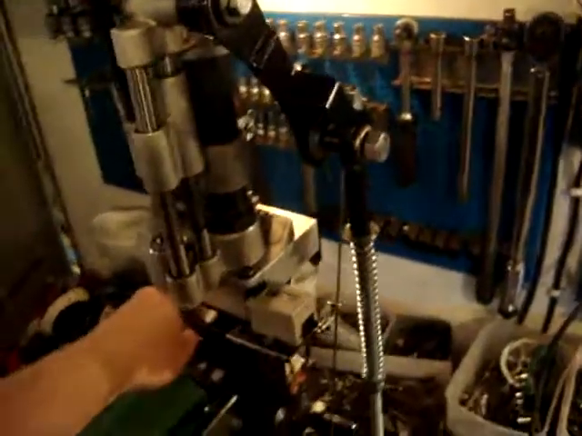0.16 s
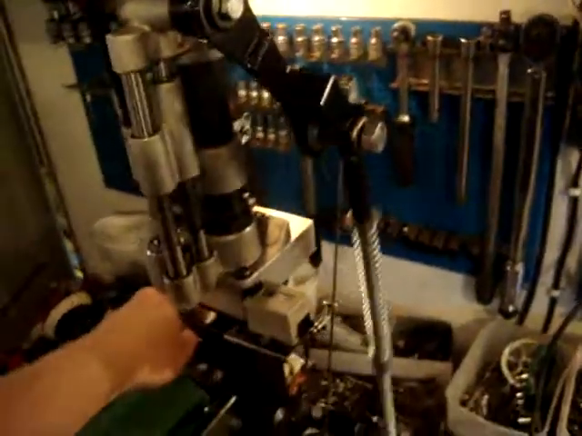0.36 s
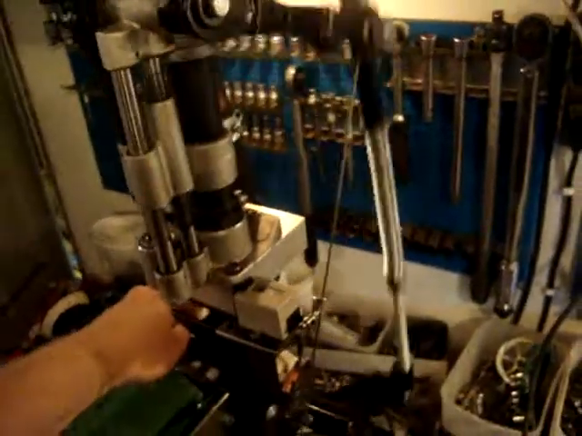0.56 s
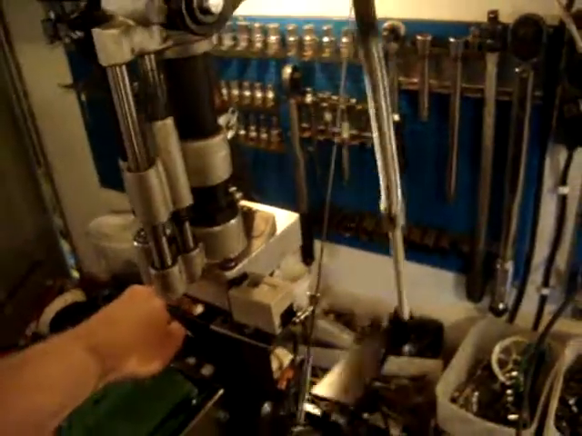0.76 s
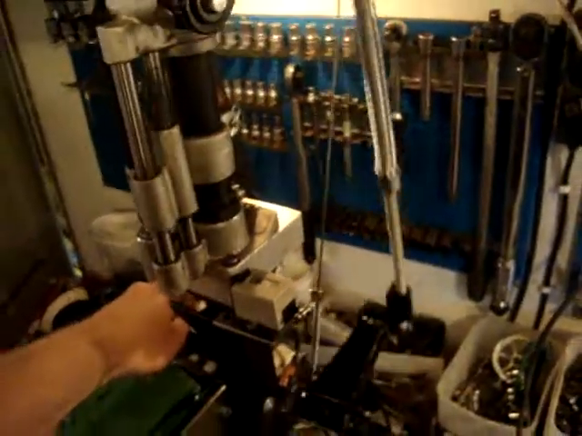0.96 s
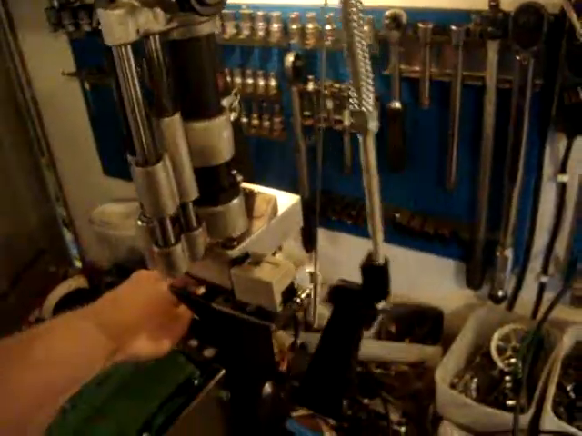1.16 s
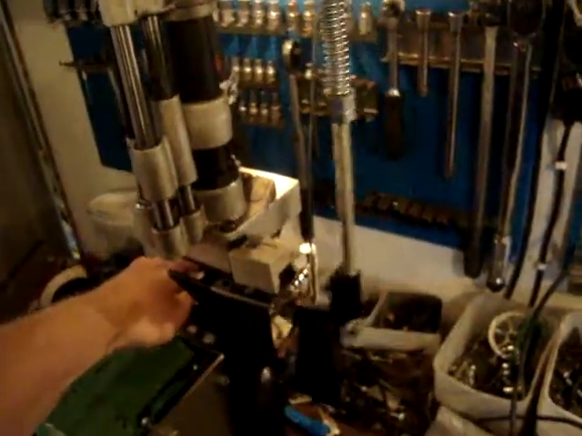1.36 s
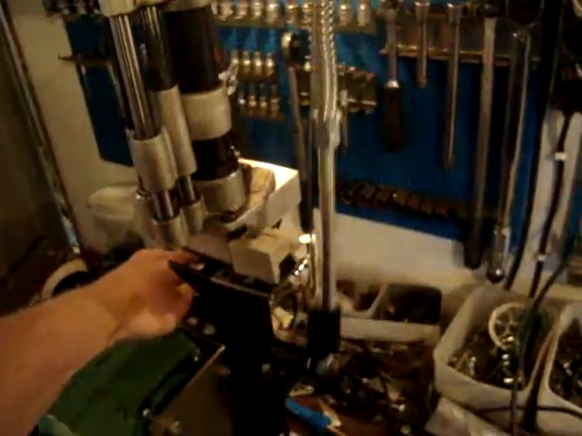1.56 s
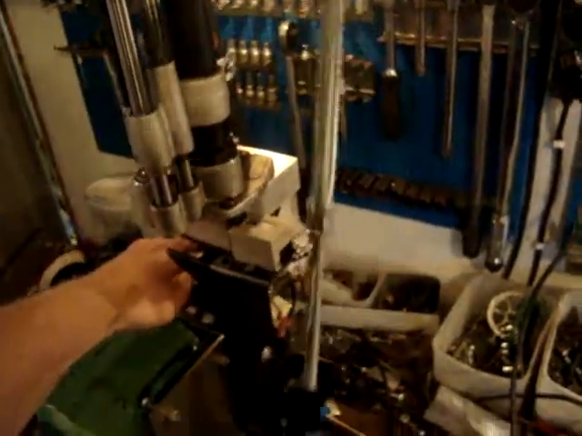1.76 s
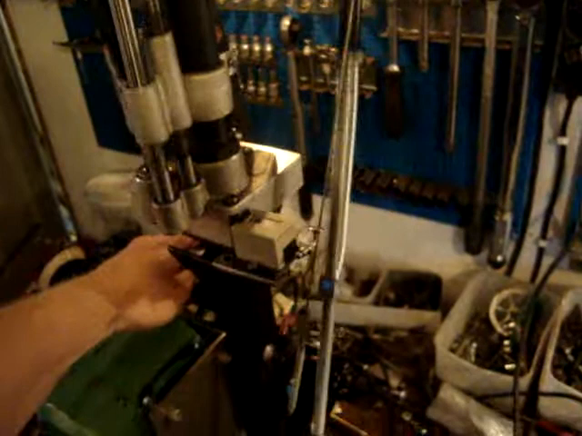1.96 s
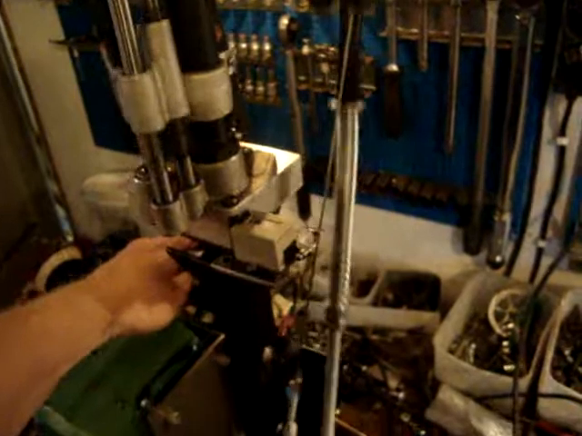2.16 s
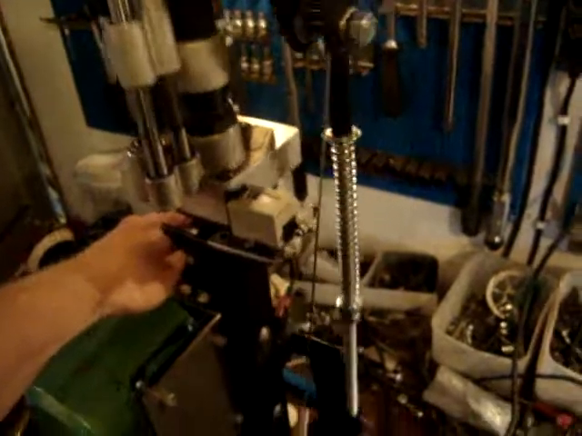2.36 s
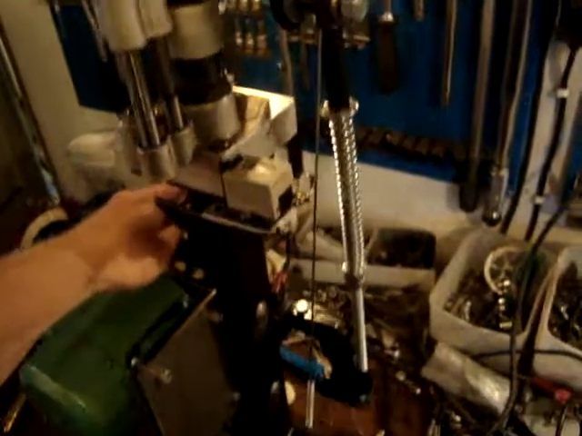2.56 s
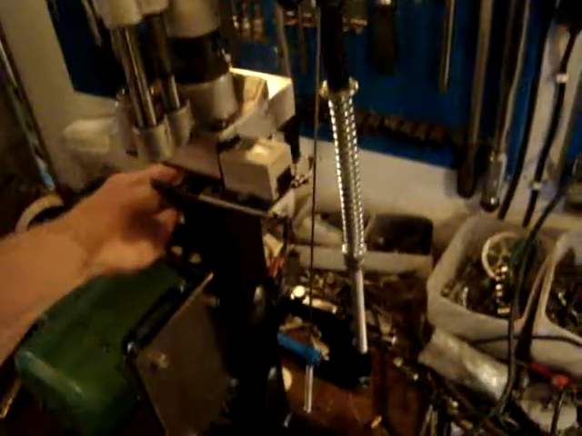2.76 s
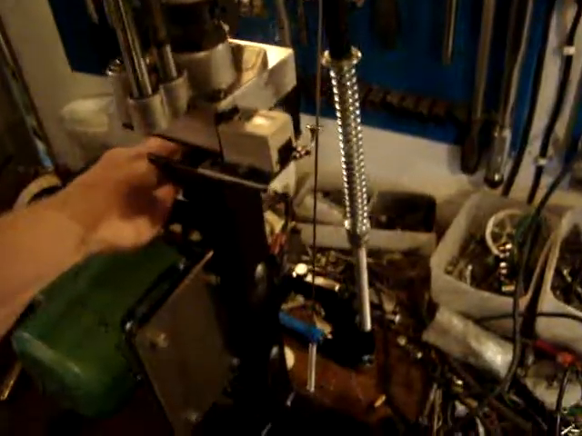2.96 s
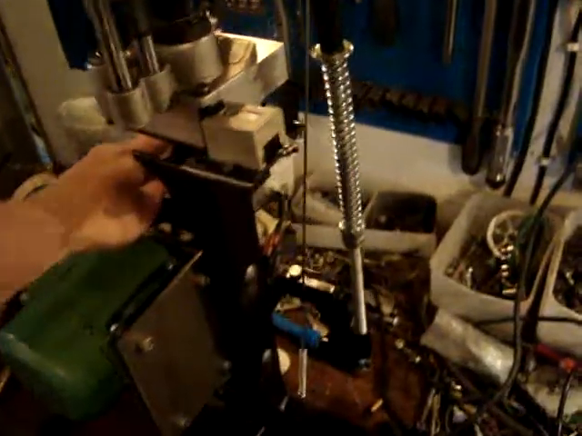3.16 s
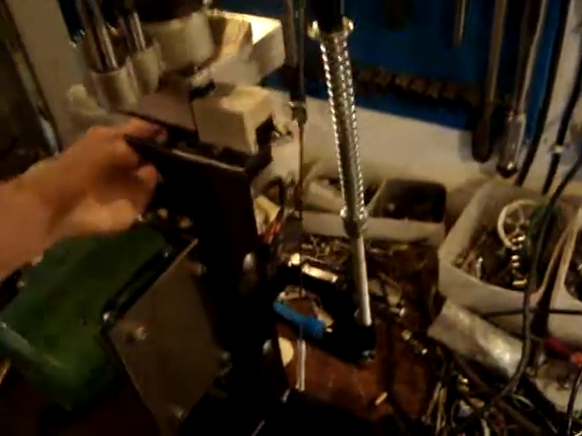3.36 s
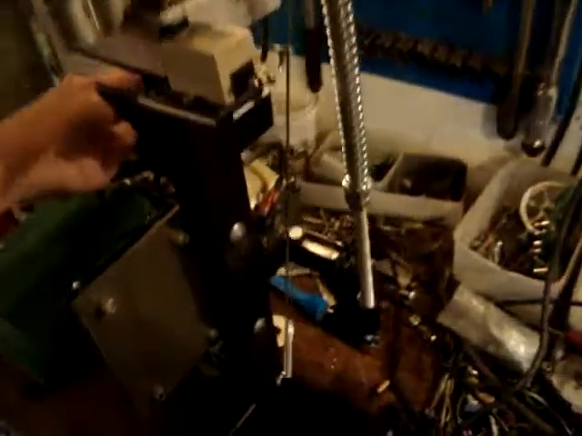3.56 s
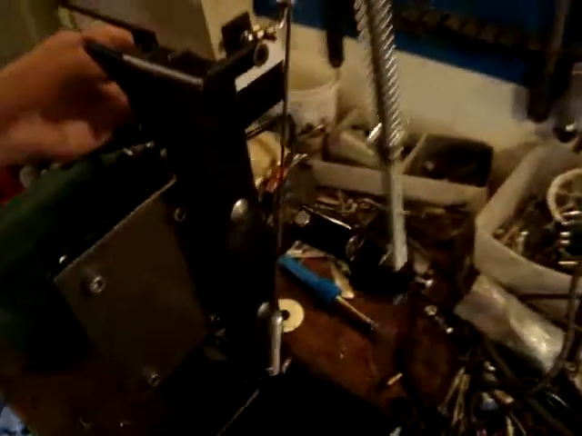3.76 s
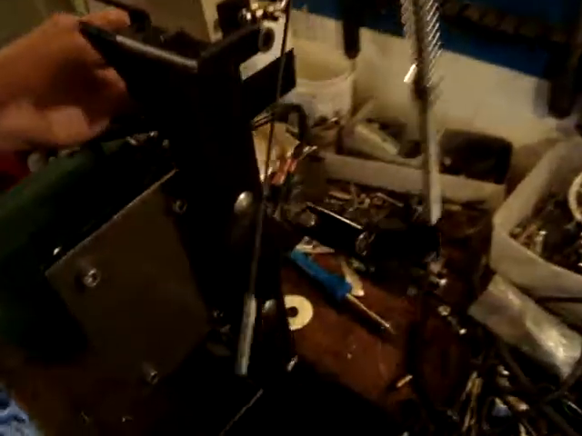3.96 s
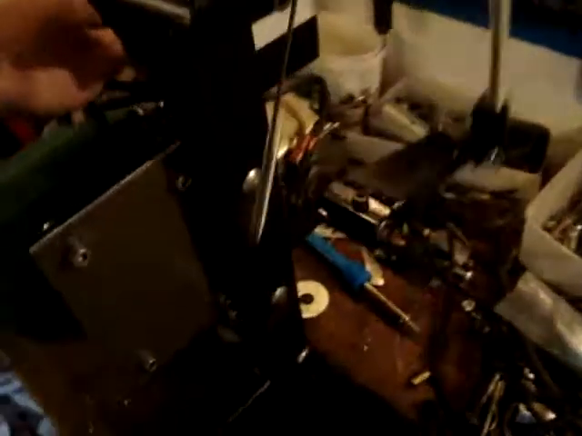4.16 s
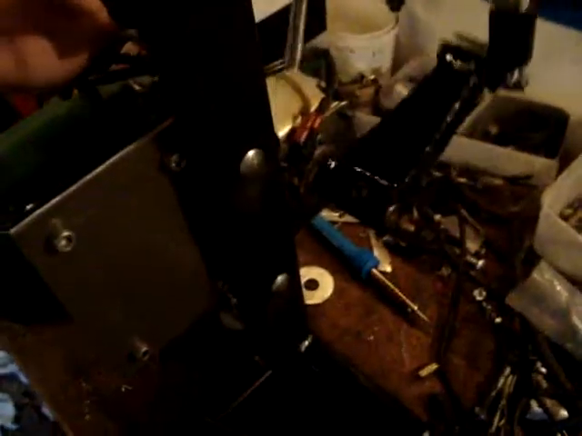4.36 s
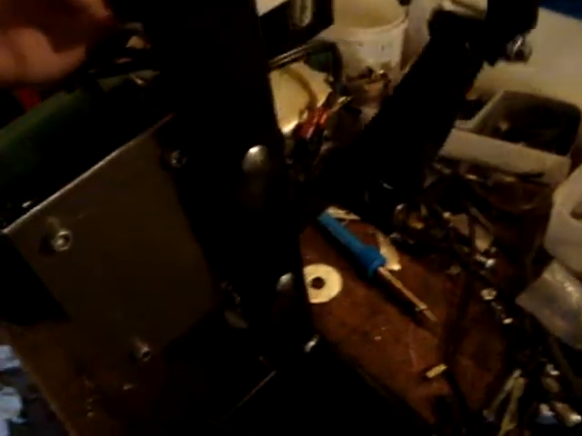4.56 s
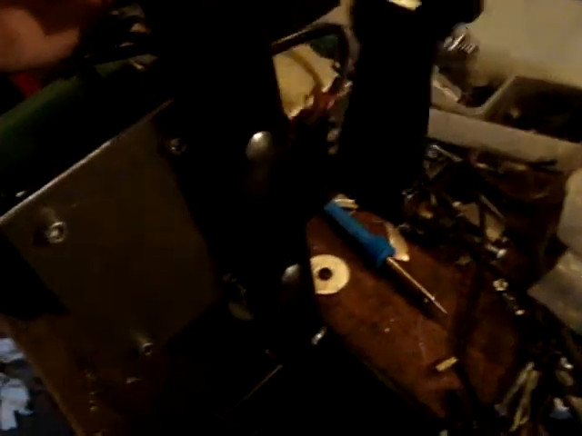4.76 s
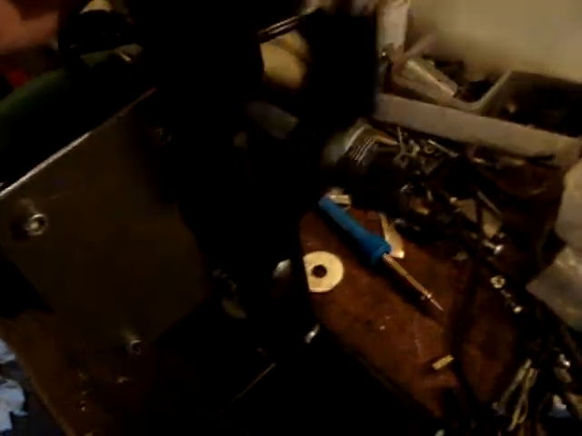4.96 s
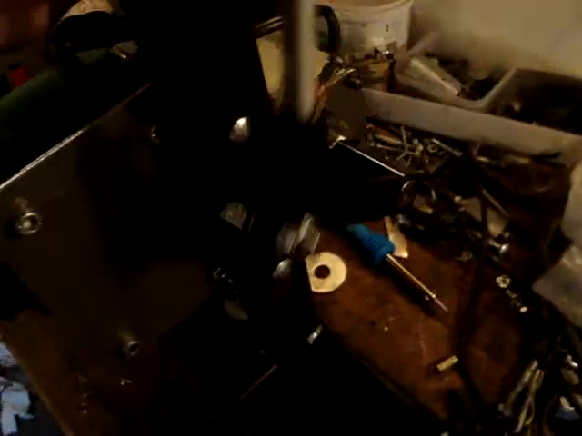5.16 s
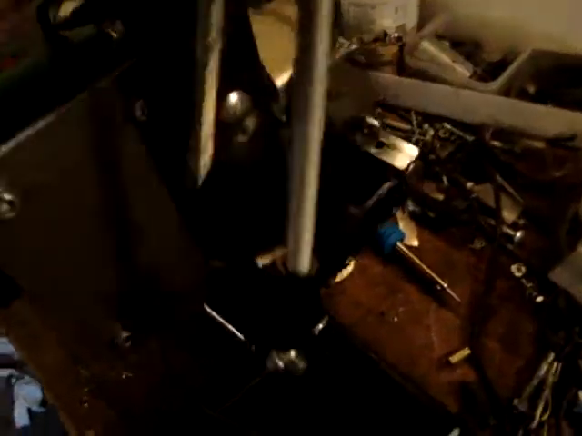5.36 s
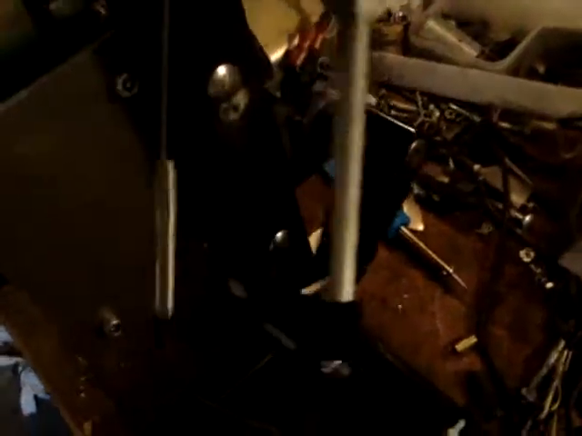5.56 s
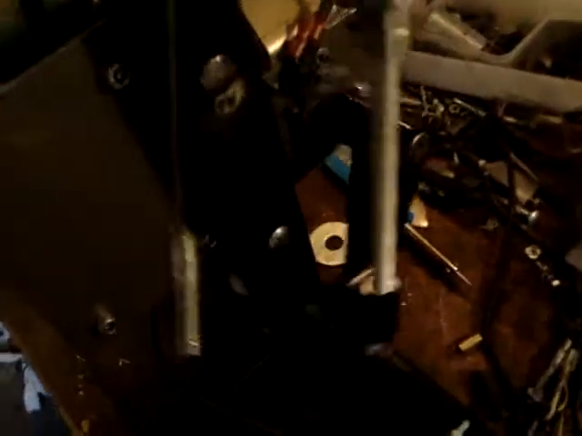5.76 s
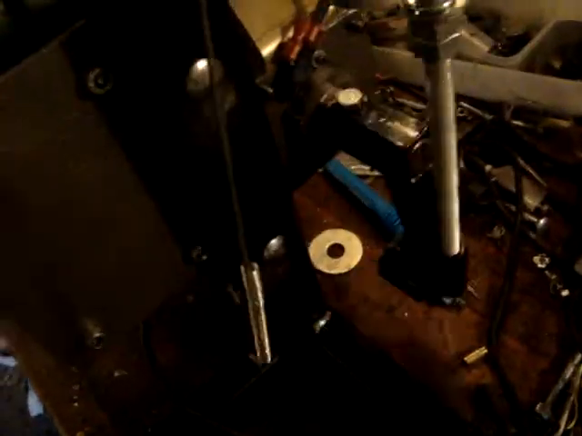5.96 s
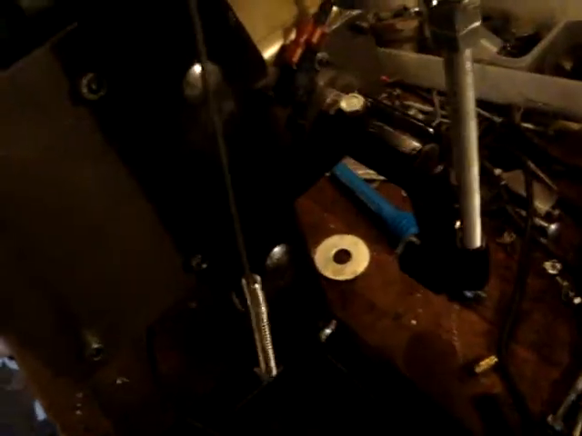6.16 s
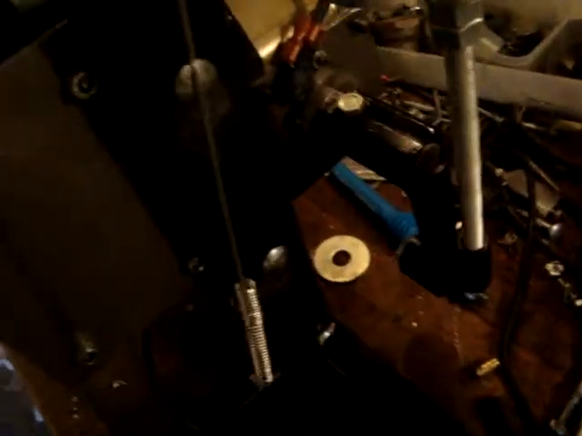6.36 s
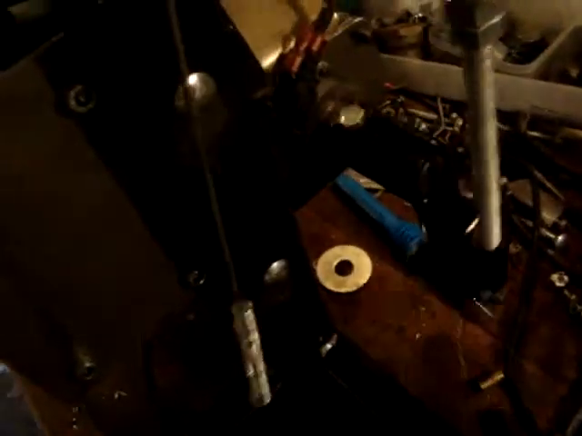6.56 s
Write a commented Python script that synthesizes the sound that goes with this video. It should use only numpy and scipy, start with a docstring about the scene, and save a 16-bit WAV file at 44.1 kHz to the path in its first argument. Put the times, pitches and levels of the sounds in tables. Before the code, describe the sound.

A small motor-driven press clacks on, whirs with a throbbing metallic ring, scrapes down and up, then coasts quiet before a second cycle and third start.

```python
"""Small motor-driven press

An electric motor drives a lever press through two cycles and starts a third, close by in a workshop.
The switch clacks, the shaft spins up, and gear contacts ring the metal with a throb once a turn over a hum.
The linkage scrapes down and back up in jerky sprays of tiny contacts while the speed sags; then the shaft
coasts to rest. Short noise bursts make the clacks, knocks and pings; faint squeaks glide in the pause."""
import sys
import numpy as np
from scipy import signal
from scipy.fft import rfft, irfft
from scipy.io import wavfile
from scipy.ndimage import uniform_filter1d, map_coordinates

SR = 44100
rng = np.random.default_rng(int(sys.argv[2]) if len(sys.argv) > 2 else 0)


def put_to_file(sound):
    """Save the sound as 16-bit audio at rate SR, in the file named by the first command-line argument."""
    columns = np.atleast_2d(sound).T  # one column per channel
    safe = np.clip(columns, -1, 1)
    whole_steps = np.round(safe * 32767)
    wavfile.write(sys.argv[1], SR, whole_steps.astype(np.int16))


N = 291060
T = np.arange(N) / SR  # time in seconds


def motor():
    """Gear contacts ring the housing and frame over the hum of the shaft; effort makes them louder."""
    # how hard the drive works through a cycle:
    # after_switch_on_s [s], gear_effort [0-1], hum_share [0-1]
    stages = [(.15, 0.71, 0.57), (.77, 0.8, 0.81), (.97, 0.9, 0.2), (1.15, 0.56, 0.1), (1.3, 0.56, .3),
              (1.5, 0.88, 0), (1.62, 0.15, 0.2), (2.1, .35, 0.48)]
    turns, pace, since = turn_shaft()
    stage_s, gear_efforts, hum_shares = np.transpose(stages)
    effort = np.interp(since, stage_s, gear_efforts)
    hum_share = np.interp(since, stage_s, hum_shares)
    at_speed = np.interp(pace, [0.9, 0.95], [0, 1])
    # the throb takes a moment to build up after the start and lingers as the shaft slows
    swing = signal.lfilter(*signal.butter(1, 1, fs=SR), at_speed)
    gears = housing_ring(turns, pace, at_speed, swing, effort)
    gears = gears + upper_whine(turns, pace, swing, effort)
    gears = gears + frame_and_bearings(turns, pace, swing, effort)
    return gears + hum(turns, pace, hum_share)


def turn_shaft():
    """Spin up, sag and coast the shaft: gives turns made, share of full speed, seconds since switch-on."""
    # press cycles: start_s [s], speed [turns/s], sag [turns/s],
    # angle [turns] as the stroke begins (or at the end of the sound if that comes first)
    cycles = [(0.181, 24.9, 1.1, -.27), (3.655, 24.62, .5, -.06), (6.522, 24.6, .5, 0)]
    stroke_from_s, stroke_to_s, switch_off_s = 0.79, 1.53, 2.26  # counted from switch-on
    spin_up_s, coast_s = 0.045, 0.35
    early_drag = 0.42  # share of the sag already felt before the stroke
    turns, pace, since = np.zeros((3, N))
    for start_s, speed, sag, angle in cycles:
        age = np.maximum(T - start_s, 0)
        spin_up = 1 - np.exp(-age / spin_up_s)
        coast = np.clip(1 - (age - switch_off_s) / coast_s, 0, 1)
        share = spin_up * coast
        drag = np.where(age < stroke_from_s, early_drag, age < stroke_to_s)
        made = np.cumsum(share * (speed - sag * drag)) / SR
        made = made + angle - np.interp(start_s + stroke_from_s, T, made)
        turns, pace, since = np.where(age > 0, [made, share, age], [turns, pace, since])
    return turns, pace, since


def housing_ring(turns, pace, at_speed, swing, effort):
    """Gear contacts ring the gear housing; at full speed the tooth tone lands near its main resonance."""
    # modes of the gear housing: pitch_hz [Hz], width_hz [Hz], above_db [dB], beside_db [dB]
    modes = [(827, 71, -29.5, -2), (895, 15, 7.5, 4.5), (933, 48, -1, 3), (978, 143, -33, -2)]
    # loudness: idle_db [dB], added_by_effort_db [dB], speed_power [exponent], added_beside_base_db [dB]
    law = (-40, 9, 1.9, 1.5)
    # moments when the housing sings out: peak_s [s], rise_s [s], fall_s [s], level_db [dB]
    swells = [(0.212, 0.017, 0.048, -27), (.56, 0.036, 0.16, -30.5), (1.03, 0.072, 0.041, -36),
              (1.69, 0.023, 0.031, -40), (1.95, 0.063, 0.066, -40), (4.49, 0.042, 0.056, -31.5),
              (5.79, 0.094, 0.054, -32.5), (6.54, .004, 0.021, -25)]
    ring = steady(housing(teeth(turns, repeat=0.56), modes))
    # strength of the tooth tone against the rough ring: from above, then from beside the base
    tooth_above, tooth_beside = 0.64, 0.71
    tooth_share = tooth_above + (tooth_beside - tooth_above) * beside_base()
    tooth_tone = tooth_share * at_speed * mesh(turns, order=36, wobble=1.1)
    throb_db = 0.5 + swing * (9.5 + 1.5 * walk(12))
    ring = steady(ring + tooth_tone) * pressure(turns, throb_db, lead=0.02)
    return ring * (loudness(law, pace, effort) + surges(swells) * (pace > 0))


def upper_whine(turns, pace, swing, effort):
    """Gear contacts ring two higher modes, whose throb comes about a fifth of a turn later."""
    # modes of the whine: pitch_hz [Hz], width_hz [Hz], above_db [dB], beside_db [dB]
    modes = [(2081, 53, 0.019, 0), (2157, 35, 0.0028, 1.6)]
    # loudness: idle_db [dB], added_by_effort_db [dB], speed_power [exponent], added_beside_base_db [dB]
    law = (-44.5, 6.5, 4, 1)
    # moments when the whine swells: peak_s [s], rise_s [s], fall_s [s], level_db [dB]
    swells = [(2.27, 0.16, 0.13, -44.5), (4.2, 0.14, 0.25, -34), (4.95, 0.062, 0.026, -34.5)]
    whine = steady(housing(teeth(turns, repeat=0.32), modes)) * undb(1.2 * walk(26))
    whine = flutter(whine, turns, depth_s=0.00012)
    whine = whine * pressure(turns, throb_db=6.5 * swing, lead=-0.2)
    return whine * (loudness(law, pace, effort) + surges(swells) * (pace > 0))


def frame_and_bearings(turns, pace, swing, effort):
    """Contacts ring the frame with a throb; the bearings add a broad rattle that does not throb."""
    # modes of the frame: pitch_hz [Hz], width_hz [Hz], above_db [dB], beside_db [dB]
    modes = [(412.3, 21, 7.5, -12), (622, 106, 6, -4.5), (1119, 29.5, 13, 9), (1335, 53, 7, 3.5),
             (1727, 102, 6, 1), (2520, 77, -19, -24.5), (3052, 90, 2, 1), (5040, 440, -10.5, -13.5)]
    # tone balance of the bearing rattle: pitch_hz [Hz], level_db [dB]
    bearing_tone = [(60, -35), (170, -25), (300, -4.5), (600, -4), (900, 5.5), (1500, -3.5), (2100, 4),
                    (2400, -2), (3400, -5.5), (4300, -10.5), (6000, -14), (7400, -14), (10000, -24.5)]
    # loudness: idle_db [dB], added_by_effort_db [dB], speed_power [exponent], added_beside_base_db [dB]
    law = (-38, 10.5, 4, 0.57)
    frame = steady(housing(teeth(turns, repeat=0.34), modes)) * undb(0.9 * walk(9))
    frame = frame * pressure(turns, throb_db=6 * swing, lead=0.03)
    bearings = steady(colour(teeth(turns, repeat=0.62), bearing_tone)) * undb(1.4 * walk(110))
    return unit(undb(-2) * frame + bearings) * loudness(law, pace, effort)


def hum(turns, pace, share):
    """Shaft harmonics, the magnetic hum at twice the mains rate, and rumble through the bench."""
    # hum partials: order [multiple of the shaft speed], level_db [dB]
    partials = [(2, -23), (4, -17.5), (5, -10.5), (6, -11), (7, -10), (8, 1.5), (9, -6.5), (10, -11),
                (11, -25), (12, 2.5), (13, -3), (17, 1), (24, -0.5), (25, -8), (26, 5), (27, -1)]
    # tone balance of the bench rumble: pitch_hz [Hz], level_db [dB]
    rumble_tone = [(20, -22.5), (48, -9.5), (70, -10.5), (130, -22.5), (200, 5.5), (320, 1), (600, -0.5),
                   (1500, -45)]
    # loudness: idle_db [dB], added_by_share_db [dB], speed_power [exponent], added_beside_base_db [dB]
    law = (-63, 26, 3, 3)
    shaft = 0
    for order, level_db in partials:
        tone = np.sin(2 * np.pi * (order * turns + rng.random()))
        shaft = shaft + undb(level_db + 3.5 * walk(9)) * tone
    mains = unit(np.sin(2 * np.pi * 100 * T))
    rumble = unit(colour(rng.standard_normal(N), rumble_tone))
    mix = unit(shaft) + undb(-15) * mains + undb(-6.5) * rumble
    return mix * loudness(law, pace, share)


def teeth(turns, repeat):
    """Gear contacts: the same flaws come round each turn amid free rattle; repeat is their power share."""
    flaws = impacts(count=1800, per_s=9000, spread_db=2.5)
    place = turns % 1 * len(flaws)
    worn = unit(map_coordinates(flaws, [place], order=3, mode="grid-wrap"))
    free = impacts(count=N, per_s=6000, spread_db=2.5)
    return np.sqrt(repeat) * worn + np.sqrt(1 - repeat) * free


def mesh(turns, order, wobble):
    """The tone of teeth meeting, a little unsteady; order is its cycles per turn."""
    return unit(np.sin(2 * np.pi * order * turns + wobble * walk(25)))


def pressure(turns, throb_db, lead):
    """An off-centre wheel squeezes the mesh briefly once a turn; the mean power stays about the same."""
    squeeze = undb(throb_db * np.cos(np.pi * (turns + lead)) ** 6)
    return squeeze / np.sqrt(uniform_filter1d(squeeze ** 2, size=5400))


def flutter(x, turns, depth_s):
    """The off-centre wheel runs ahead and behind once a turn, which bends the pitch."""
    moment = T + depth_s * np.sin(2 * np.pi * turns)
    return map_coordinates(x, [moment * SR], order=3, mode="nearest")


def housing(x, modes):
    """Cast modes ring together; their balance shifts as the listener moves down beside the base."""
    low = beside_base()
    out = 0
    for k, (pitch_hz, width_hz, above_db, beside_db) in enumerate(modes):
        gain = undb(above_db + low * (beside_db - above_db))
        out = out + (-1) ** k * gain * resonate(x, pitch_hz, width_hz)  # neighbours in opposite sense
    return out


def beside_base():
    """The listener moves from above the press (0) down beside its base (1) during the pause."""
    return np.interp(T, [2.8, 3.7], [0, 1])


def loudness(law, pace, effort):
    """Gain of a motor layer: it grows with the shaft speed and the effort."""
    idle_db, effort_db, power, beside_db = law
    return undb(idle_db + effort_db * effort + beside_db * beside_base()) * pace ** power


def surges(rows):
    """Extra gain of a resonance: each surge swells and dies away."""
    out = 0
    for peak_s, rise_s, fall_s, level_db in rows:
        away = np.maximum((peak_s - T) / rise_s, (T - peak_s) / fall_s)
        out = out + undb(level_db) * np.exp(-away)
    return out


def linkage():
    """Rod, spring and ram slide in jerks: dense contacts ring the rod, which groans under load."""
    # modes of the rod and spring: pitch_hz [Hz], width_hz [Hz], level_db [dB]
    rod_modes = [(442, 30, 2), (947, 32, 18), (1663, 18, 14.5), (2060, 34, -14), (2743, 45, 5.5),
                 (3130, 250, -4), (3440, 53, -15), (4030, 50, 1), (4920, 57, -5), (5270, 55, -3),
                 (6550, 70, -19)]
    # tone balance of the sliding: pitch_hz [Hz], level_db [dB]
    slide_tone = [(50, -30), (150, -38), (350, 0), (700, -4.5), (1000, 3), (1350, 1.5), (1600, 1.5),
                  (2100, 8.5), (3000, 9.5), (4100, 11.5), (5500, 5.5), (7000, 8), (10000, -12.5)]
    # each stroke rubs four times: bite, slide down, slide up (finer grit stands out more), last catch:
    # start_s [s], length_s [s], friction_db [dB], slope_db [dB/s],
    # grit_db [dB against the friction], groan_db [dB], groan_hz [Hz]
    scrapes = [(1.0, 0.055, -24.5, 30, -5, -28, 1153), (1.145, 0.2, -24, -47, -6, -27.5, 1290),
               (1.506, 0.15, -30, -1, -2, -32, 1369), (1.652, 0.014, -24, -27, -4.5, -29, 1369),
               (4.465, 0.061, -26.5, 42, -5.5, -32, 1160), (4.599, 0.23, -24.5, -44.5, -7, -33, 1297),
               (4.965, 0.13, -33, 10, 0, -40, 1306), (5.115, 0.017, -28, 30, 0, -33.5, 1297)]
    jerks = unit(undb(walk(45) + 1.82 * walk(160)))
    contacts = impacts(count=N, per_s=12000, spread_db=1)
    rod = 0
    for pitch_hz, width_hz, level_db in rod_modes:
        rod = rod + undb(level_db + 3 * walk(30)) * resonate(contacts, pitch_hz, width_hz)
    friction = steady(unit(colour(contacts, slide_tone)) + unit(rod))
    # the fine grit flickers at random, each high band on its own
    grit = 0
    for hz in np.geomspace(4500, 9500, num=6):
        band = resonate(impacts(count=N, per_s=8000, spread_db=1), hz, hz / 8)
        grit = grit + band * undb(5 * walk(70))
    grit = unit(grit * undb(2.6 * walk(55)))
    # the groan is a rough band around a pitch that is higher in the slides than in the bite
    rough = walk(170) + 1j * walk(170)
    out = 0
    for start_s, length_s, friction_db, slope_db, grit_db, groan_db, groan_hz in scrapes:
        groan = np.real(rough * np.exp(2j * np.pi * groan_hz * T))
        scrape = undb(friction_db) * (friction + undb(grit_db) * grit)
        out = out + rub(start_s, length_s, slope_db) * (scrape + undb(groan_db) * groan)
    return jerks * out


def rub(start_s, length_s, slope_db):
    """Envelope of one scrape: quick attack, a sloping hold, release."""
    attack_s, release_s = 0.0076, 0.054
    age = np.maximum(T - start_s, 0)
    hold = undb(slope_db * np.minimum(age, length_s))
    release = np.exp(-np.maximum(age - length_s, 0) / release_s)
    return np.minimum(age / attack_s, 1) * hold * release


def blows():
    """All the short blows: switch clacks, play taken up in the linkage, latch pings and odd knocks."""
    return clacks() + take_ups() + pings() + odd_knocks()


def clacks():
    """Each switch or latch clack is a noise burst that also rings the switch bracket in its own measure."""
    # clacks: start_s [s], burst_db [dB before the filters], t60_s [s to fall 60 dB],
    # ring_db [dB, gain of the bracket ring]
    rows = [(0.206, -29, 0.066, 19.5), (2.419, -31.5, 0.096, 7), (2.445, -36.5, 0.03, 20),
            (3.671, -33.5, 0.14, 9.5), (3.712, -34.5, 0.074, 14), (5.325, -30.5, 0.045, -10),
            (5.874, -28, 0.043, 1), (5.895, -31, 0.06, 19.5), (6.548, -25.5, 0.078, 8.5)]
    # tone balance of a clack: pitch_hz [Hz], level_db [dB]
    clack_tone = [(80, -23), (400, -10), (800, 12.5), (1250, 8), (1550, 1), (1850, -2), (2700, 2),
                  (4200, 3), (6000, -3.5), (10000, -7.5)]
    # modes of the switch bracket: pitch_hz [Hz], width_hz [Hz], level_db [dB]
    bracket_modes = [(1310, 17, 2), (1817, 270, 6), (1820, 20, -32), (2260, 21, 5.5), (2850, 84, 6),
                     (3410, 19, 11.5), (3570, 26, -4), (4450, 220, -25.5)]
    out = 0
    for start_s, burst_db, t60_s, ring_db in rows:
        chatter = strike(rng.standard_normal(N), start_s, burst_db, t60_s)
        bracket = sum(undb(level_db) * resonate(chatter, pitch_hz, width_hz)
                      for pitch_hz, width_hz, level_db in bracket_modes)
        out = out + undb(5) * colour(chatter, clack_tone) + undb(ring_db) * bracket
    return out


def take_ups():
    """The linkage takes up its play at each end of a stroke: a crack, then a thud through the bench."""
    # start_s [s], crack_db [dB peak], crack_t60_s [s to fall 60 dB], thud_db [dB peak]
    rows = [(0.983, -11.5, .077, -36), (1.724, -17.5, 0.082, -46.5), (4.441, -11.5, 0.39, -39),
            (5.186, -15, 0.062, -56)]
    thud_lag_s = 0.029
    out = 0
    for start_s, crack_db, crack_t60_s, thud_db in rows:
        out = out + knock(start_s, crack_db, 1830, 3700, crack_t60_s)
        out = out + knock(start_s + thud_lag_s, thud_db, 170, 390, 0.14)
    return out


def pings():
    """The latch pings just after the crank sets off: a short, high blow."""
    # start_s [s], level_db [dB peak]
    rows = [(0.304, -18), (3.768, -12.5)]
    return sum(knock(start_s, level_db, 5600, 2100, 0.04) for start_s, level_db in rows)


def odd_knocks():
    """Odd knocks and ticks of the mechanism, each a noise burst in its own band."""
    # start_s [s], level_db [dB peak], pitch_hz [Hz], width_hz [Hz], t60_s [s to fall 60 dB]
    rows = [(0.061, -41, 1800, 2000, .04), (1.444, -23, 5900, 5000, 0.059), (2.845, -51, 2280, 150, .08),
            (3.202, -18, 1380, 1230, 0.014), (3.2022, -27, 4000, 3500, 0.013),
            (3.202, -47, 250, 350, 0.067), (4.458, -15.5, 684, 724, 0.099), (4.858, -23, 3500, 4000, 0.036),
            (6.392, -34.5, 547, 320, 0.015), (6.446, -33.5, 3290, 800, 0.032),
            (6.447, -39, 1370, 800, 0.054), (6.483, -45, 520, 350, 0.015),
            (6.546, -16.5, 1287, 205.4, 0.06)]
    return sum(knock(*row) for row in rows)


def knock(start_s, level_db, pitch_hz, width_hz, t60_s):
    """A short blow that sounds in one band, scaled to its peak level."""
    body = strike(rng.standard_normal(N), start_s, 0, t60_s)
    for _ in range(2):
        body = resonate(body, pitch_hz, width_hz)
    return undb(level_db) * body / np.abs(body).max()


def strike(sound, start_s, level_db, t60_s):
    """A sound that starts at a given time and dies away by 60 dB in t60_s."""
    age = np.clip(T - start_s, 0, 10 * t60_s)
    attack = np.minimum(age / 0.00042, 1)
    decay = np.exp(-np.log(1000) * age / t60_s)
    return sound * (undb(level_db) * attack * decay + 1e-18)  # the tiny floor is inaudible


def squeaks():
    """Thin gliding tones in the pause swell and fade."""
    # start_s [s], length_s [s], level_db [dB peak], from_hz [Hz], to_hz [Hz]
    rows = [(2.9, .13, -57.5, 4340, 4640), (3.03, .1, -57, 4770, 4640)]
    out = 0
    for start_s, length_s, level_db, from_hz, to_hz in rows:
        along = np.clip((T - start_s) / length_s, 0, 1)
        hz = from_hz + (to_hz - from_hz) * along + 12 * walk(150)
        tone = np.sin(2 * np.pi * np.cumsum(hz) / SR)
        out = out + undb(level_db) * np.sin(np.pi * along) * tone
    return out


def workshop(x):
    """Short scattered reflections off the bench and tool wall, and the quiet room noise."""
    # tone balance of the room noise: pitch_hz [Hz], level_db [dB]
    room_tone = [(18, -60), (30, -29), (76, -18), (215, -3.5), (249, -2), (404, -2), (456, 1), (859, -2),
                 (1180, -2.5), (2330, -8.5), (4590, -10.5), (5190, -12), (10000, -16), (13000, -59),
                 (22000, -120)]
    # level of the room noise: time_s [s], level_db [dB]
    room_level = [(0, -56), (3.6, -56), (6.2, -58.5), (6.6, -57)]
    age = T[:SR // 2]
    tail = rng.standard_normal(len(age)) * np.exp(-np.log(1000) * age / 0.22)  # falls 60 dB in 0.22 s
    tail = tail * (age > 0.004)  # the first reflections arrive after 4 ms
    echo = signal.fftconvolve(x, tail / np.sqrt(np.sum(tail ** 2)))[:N]
    air_db = np.interp(T, *np.transpose(room_level)) + 0.15 * walk(7.3)
    air = unit(colour(rng.standard_normal(N), room_tone)) * undb(air_db)
    return x + undb(-32.5) * echo + air


def undb(db):
    """Decibels to gain."""
    return 10 ** (np.asarray(db) / 20)


def unit(x):
    """Scale to an average strength (rms) of 1."""
    return x / np.sqrt(np.mean(x ** 2))


def steady(x):
    """Even out the strength over a little less than one full-speed shaft turn."""
    floor = np.mean(x ** 2) / 20 / 20  # keeps quiet stretches from being blown up
    return x / np.sqrt(uniform_filter1d(x ** 2, size=1500) + floor)


def walk(rate):
    """Slow random wandering with a spread of about 1; rate is new values per second."""
    k = int(SR / rate)
    steps = np.repeat(rng.standard_normal(N // k + 1), k)
    return unit(uniform_filter1d(steps, k)[:N])


def impacts(count, per_s, spread_db):
    """Dense tiny contacts of uneven strength, over count samples."""
    hits = rng.random(count) < per_s / SR
    strength = rng.standard_normal(count) * undb(spread_db * rng.standard_normal(count))
    return unit(hits * strength)


def resonate(x, hz, width_hz):
    """One resonance, gain 1 at its centre."""
    return signal.lfilter(*signal.iirpeak(hz, hz / width_hz, fs=SR), x)


def colour(x, points):
    """Filter with the given (Hz, dB) outline that only looks back in time (minimum phase)."""
    size = 2048
    hz, db = np.transpose(points)
    grid_hz = np.arange(size + 1) * SR / 2 / size + 1
    log_gain = np.log(undb(np.interp(np.log(grid_hz), np.log(hz), db)))
    # folding the cepstrum makes the response start at once
    cepstrum = irfft(log_gain)
    cepstrum[1:size] *= 2
    cepstrum[size + 1:] = 0
    response = irfft(np.exp(rfft(cepstrum)))
    return signal.fftconvolve(x, response)[:len(x)]


def scene():
    """The press on its bench in the workshop."""
    return workshop(motor() + linkage() + blows() + squeaks())[None]


def record(dry):
    """Rounds the loudest peaks and leaves out everything above about 10 kHz."""
    top_hz = 10150
    rounded = 0.5 * np.tanh(dry / 0.5)
    return signal.sosfilt(signal.ellip(12, 0.2, 75, top_hz, fs=SR, output="sos"), rounded)


dry = scene()
out = record(dry)
put_to_file(out)
```